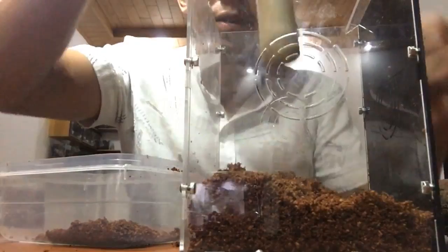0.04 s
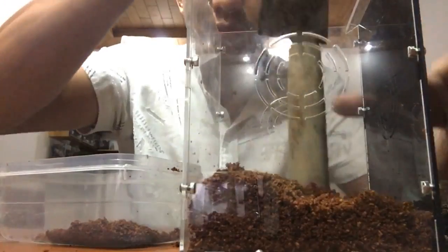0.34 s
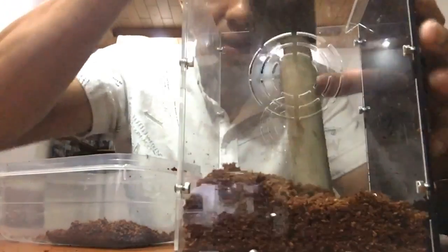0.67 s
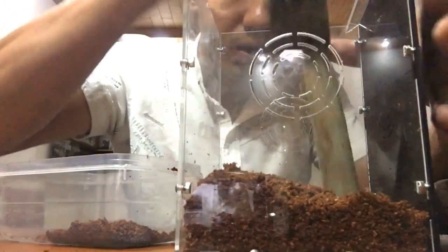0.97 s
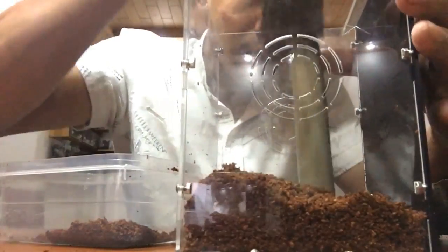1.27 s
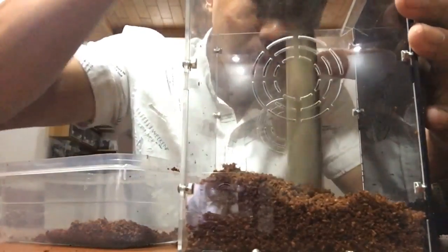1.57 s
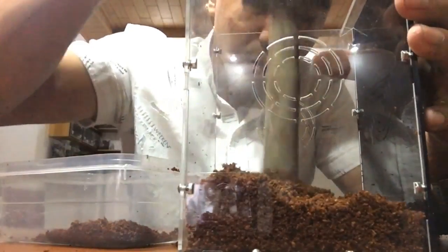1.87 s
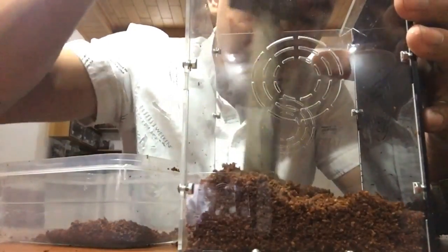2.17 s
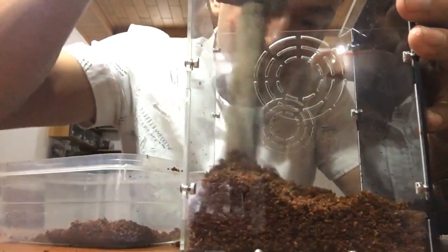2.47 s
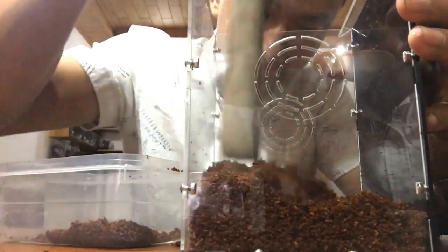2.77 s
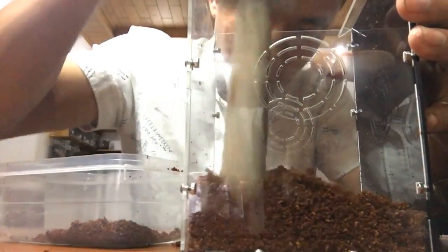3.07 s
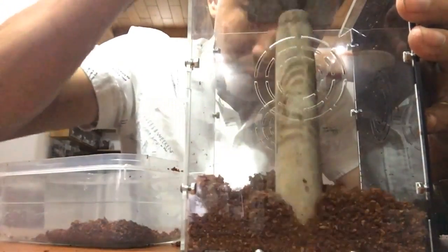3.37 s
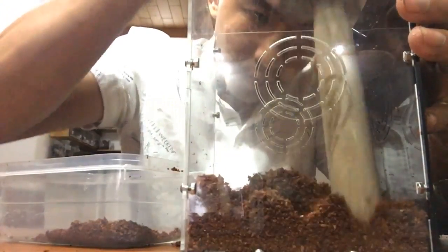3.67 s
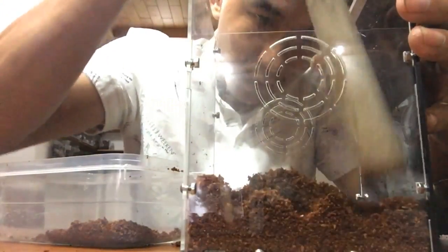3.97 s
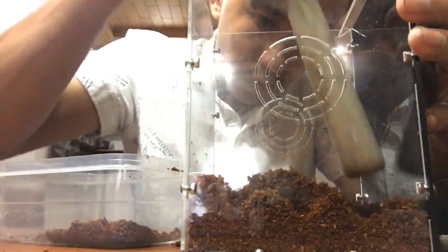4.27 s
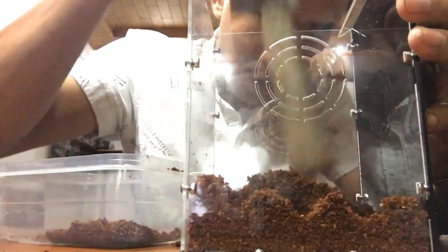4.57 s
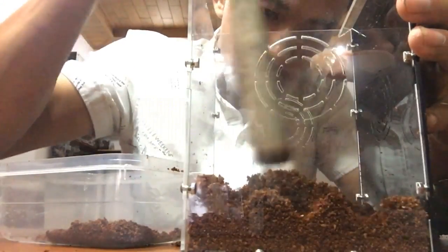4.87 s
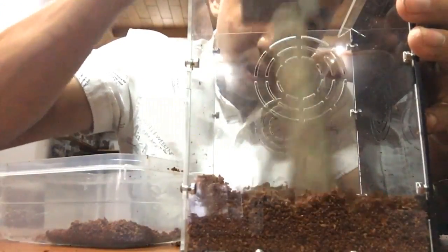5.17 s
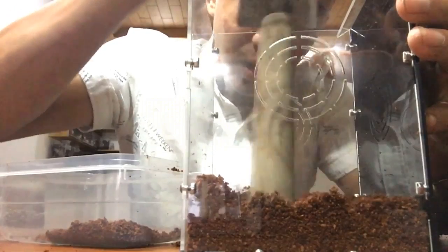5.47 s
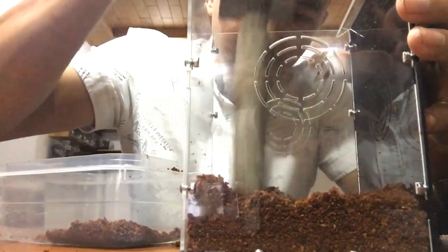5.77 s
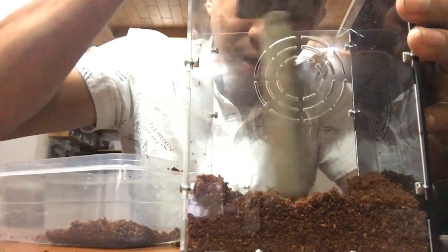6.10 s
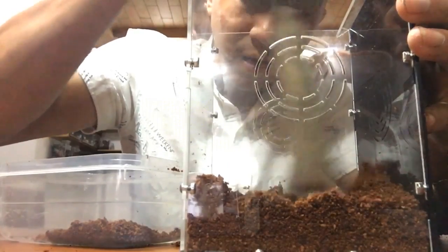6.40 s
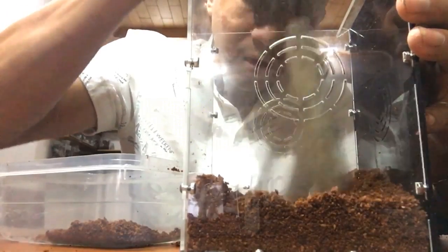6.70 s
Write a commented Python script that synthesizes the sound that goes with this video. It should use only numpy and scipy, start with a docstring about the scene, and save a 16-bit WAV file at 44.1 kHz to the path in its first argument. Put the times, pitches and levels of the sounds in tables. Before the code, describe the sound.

A wooden stick packs loose coconut fibre in a plastic enclosure on a table, heard close in a small room over faint rumble and hiss. It opens with a light rub, a brief faint ring and soft handling bumps. From about 0.8 seconds the stick tamps unevenly, roughly three times a second, each dull thud carrying a slight crunch and a low boom from the table. At about 1.0 and 1.5 seconds it strikes the wall with sharp, briefly ringing clacks. Firmer, evenly spaced thuds follow from 2.4 to 3.2 seconds. At 3.8 seconds a hard knock runs into a gritty scrape lasting a quarter of a second. Another clack comes at 4.2, a deep thump at 4.5 and a last sharp wall strike near 5.1. After that only light taps, rubs and soft bumps remain until about 6.5 seconds.

```python
"""A wooden stick tamps loose coconut coir in a clear plastic enclosure on a table, in a small room.
The coir damps each impact to a dull thud and crunches as it packs; blows that catch a wall excite
bending waves, heard as a click and a clack. Stick-slip friction gives light rubs and one long scrape.
Each push sets the table booming in its low modes, the walls ring briefly, and the room reverberates
over a faint rumble and hiss."""
import sys
import numpy as np
from scipy import signal
from scipy.fft import rfft, irfft
from scipy.io import wavfile

SR = 44100
rng = np.random.default_rng(int(sys.argv[2]) if len(sys.argv) > 2 else 0)


def file_out(sig):
    """Save sig as 16-bit WAV at sys.argv[1]."""
    # one column per channel
    cols = np.atleast_2d(sig).T
    # limit, then scale
    lim = np.clip(cols, -1, 1)
    pcm = np.round(lim * 32767).astype(np.int16)
    wavfile.write(sys.argv[1], SR, pcm)


N = 297234
TIME = np.arange(N) / SR
BLOW_TIME = np.arange(-SR // 100, SR // 6) / SR  # s around an impact
RUB_TIME = np.arange(-SR // 7, SR // 2) / SR  # s around the peak of a rub

# Levels in the tables are relative: the functions apply further gains.
# spectrum of the room's background noise: frequency_hz, level_db
AIR_SPECTRUM = [(15, -57.5), (25, -8), (76, 5), (141, -7.5), (175, -7), (270, -15), (384, -12.5),
                (439, -17.5), (677, -20.5), (1260, -20), (1610, -28.5), (2160, -17), (2480, -29),
                (6210, -35.5), (16000, -51)]
# faint bands of hiss: centre_hz, width_hz, level_db
HISS_BANDS = [(2120, 380, -78), (2950, 500, -84), (6200, 1000, -83)]
# spectrum of snapping fibres: frequency_hz, level_db
CRUNCH_SPECTRUM = [(700, -53), (1800, -4), (2700, 6.5), (3150, -1), (3800, 2), (6000, -6), (8000, -12.5),
                   (10500, -17), (13000, -8.5), (16000, -14)]
# response of the enclosure's body: frequency_hz, level_db
BODY_SPECTRUM = [(60, -14), (150, -20), (215, -6), (290, -13), (400, 5.5), (510, -12.5), (660, 1.5),
                 (850, -4), (1200, -33), (2500, -54.5)]
# response of a wall around its clack pitch: pitch_ratio, level_db
CLACK_SPECTRUM = [(.26, -8.5), (.55, -9.5), (0.751, -3.5), (1., 0.5), (1.35, -9.5), (1.601, -8), (2.1, -22),
                  (3., -41), (7., -55)]
# spectrum of a hard contact: frequency_hz, level_db
CLICK_SPECTRUM = [(700, -31.5), (1800, -10.5), (2700, 3.5), (3150, -1), (3800, -3), (5500, -8.5),
                  (8000, -12), (10500, -17), (13000, -11), (16000, -16)]
# spectrum of the stick being lowered: frequency_hz, level_db
SWISH_SPECTRUM = [(300, 6), (900, 1), (1500, 1), (2600, 6), (4200, -7), (6000, -5), (7800, -10), (9500, -9),
                  (12000, -10), (15000, -18)]
# modes of the whole box, damped by the coir: pitch_hz, level_db, t60_s
BOX_MODES = [(208.7, -1, 0.12), (265, -11, 0.034), (333.8, 5.5, 0.052), (388, -10.5, 0.1),
             (696.4, -8.5, 0.11)]
# modes of the walls: pitch_hz, level_db, t60_s
WALL_MODES = [(232, -10, 0.15), (220, -13, 0.27), (337.9, 5.5, .24), (388, -4.5, 0.21), (414, -5, 0.029),
              (463, -15, 0.38), (611, -6.5, 0.29), (652.6, 6, 0.09), (706.6, -6, 0.18), (851, -7.5, 0.38),
              (1034, -2, 0.092), (1150, 2.5, 0.12), (1300, -18.5, 0.31), (1370, -26, 0.18),
              (1630, -13.5, .15), (1810, 5, .16), (2260, -23.5, .2), (2636, -4.5, 0.14), (2790, 3.5, 0.069),
              (3730, -8, .2), (3520, -4, .18), (3907, 3.5, .22), (4320, -7.5, 0.21), (5026, -11, 0.11),
              (6150, 6, .14)]
# reverberation time of the room: frequency_hz, t60_s
ROOM_DECAY = [(100, 0.9), (300, 0.34), (800, 0.35), (2000, 0.43), (5000, 0.32), (14000, 0.27)]
# narrow resonances of the brief ring at the start: centre_hz, width_hz, level_db
OPENING_RING_BANDS = [(395, 8, -81.5), (755, 99, -54), (1306, 49, -52.5), (1541, 41, -54), (2330, 120, -58),
                      (3460, 47, -62.5)]
# stick or hand rubs on coir and plastic: peak_s, rise_s, fall_s, body_db, wall_db, crunch_db
RUBS = [(0.012, 0.012, 0.033, -40, -41.5, -54), (0.075, 0.041, 0.082, -56, -50, -61.5),
        (0.738, .027, 0.018, -39.5, -44, -59), (2.56, .012, 0.07, -55.5, -55.5, -68.5),
        (2.916, 0.04, .06, -72, -62, -68.5), (3.208, .025, 0.024, -52.5, -49.5, -62.5),
        (3.398, .01, .035, -56.5, -57.5, -75), (3.52, .026, .025, -56.5, -42, -65.5),
        (3.772, .012, 0.034, -35.5, -40, -60.5), (4.1, 0.027, .11, -51, -53.5, -56.5),
        (5.115, 0.038, 0.042, -44.5, -39.5, -54.5), (5.331, .06, 0.23, -62, -61.5, -84),
        (6.072, 0.039, 0.041, -61, -59.5, -84), (6.421, 0.032, 0.055, -65, -66, -77)]
# the side of the stick taps the plastic: start_s, clack_hz, clack_db, click_db
TAPS = [(0.017, 956, -48, -59.5), (0.846, 743, -51.5, -88), (1.039, 1498, -29, -38.5),
        (2.869, 940, -52, -83), (3.297, 1440, -45, -68), (3.597, 613, -45, -80), (3.722, 1147, -46, -65),
        (4.104, 1143, -31, -59.5), (5.287, 1493, -46.5, -74), (5.61, 1120, -53.5, -71),
        (5.664, 1822, -52, -50.5), (6.345, 714, -62.5, -85), (6.512, 1850, -54, -53.5)]
# the steadying hand leans on the enclosure and rocks the table: time_s, level_db
LEANS = [(0.122, -39.5), (0.471, -43.5), (5.928, -51), (6.368, -47), (6.45, -44.5)]
# the stick lands in the coir, then pushes on the table:
# start_s, thud_hz, thud_db, clack_db, click_db, push_delay_s, push_db
TAMPS = [(0.753, 330, -31, -45, -55.5, 0.032, -22.5), (0.872, 388, -43, -47.5, -71, 0.0445, -34),
         (1.071, 490, -31.5, -38.5, -62.5, 0.014, -30), (1.32, 586, -39, -34.5, -55.5, 0.033, -16.5),
         (1.8585, 514.3, -39.5, -33, -62, 0.041, -33), (2.128, 342.6, -38.5, -45.5, -73, 0.05, -27.5),
         (2.393, 421, -22, -33, -59, 0.02, -28.5), (2.679, 494, -22, -31, -56, .03, -29),
         (2.957, 508, -22, -32.5, -59.5, 0.038, -24.5), (3.223, 463, -24, -37.5, -69.5, 0.027, -30),
         (3.471, 601, -43.5, -33, -51.5, 0.042, -29.5), (3.55, 345.7, -33, -43, -55.5, 0.063, -35),
         (3.7361, 446, -43.5, -42, -57, .0335, -19), (3.783, 382.4, -28.5, -39.5, -53.5, 0.0287, -36),
         (3.99, 449, -33, -37, -54, 0.0094, -20), (4.117, 384.3, -33.5, -43, -65, 0.017, -43),
         (4.4693, 443, -27, -40.5, -65, 0.021, -13), (4.7436, 478, -29.5, -41.5, -83, 0.029, -30.5),
         (5.135, 387.3, -28, -32.5, -53.5, 0.02, -21.5)]
# the stick strikes a wall and skids into the coir: start_s, thud_hz, thud_db, clack_hz, clack_db,
# click_db, click_corner_hz, shudder_db, skid_db, push_delay_s, push_db
WALL_HITS = [(1.048, 568, -18.5, 1282, -21, -28.5, 2700, -20, -36.5, .036, -23.5),
             (1.5456, 860, -13.5, 1034, -17.5, -29.5, 2278, -27, -33.5, .082, -19.5),
             (3.832, 620, -16.5, 1042, -31, -45.5, 6100, -48.5, -48.5, 0.071, -31),
             (4.222, 489.4, -34, 1300, -26, -37.5, 3500, -31, -36, 0.035, -16),
             (5.061, 689, -13.5, 1386, -21, -36.5, 7200, -15, -41, .019, -17.5)]
# envelope of the long scrape: time_s, body_db, wall_db, crunch_db
SCRAPE_ENVELOPE = [(3.818, -35, -49.5, -64.5), (3.826, -23, -32.5, -48), (3.834, -18.5, -22.5, -41.5),
                   (3.906, -25, -37.5, -59), (3.924, -21, -26.5, -39), (3.97, -30.5, -21.5, -26),
                   (3.992, -21.5, -30.5, -41.5), (4.016, -45, -42.5, -55), (4.05, -45, -50, -53.5)]


def amp(db):
    """Decibels to amplitude ratio."""
    return 10 ** (np.asarray(db) / 20)


def unit_rms(x):
    """Normalisation to rms 1."""
    return x / np.sqrt(np.mean(x ** 2) + 1e-20)


def read(points, hz):
    """Interpolation on a log-frequency axis."""
    f, value = np.transpose(points)
    return np.interp(np.log(hz + 1), np.log(f + 1), value)


def add(mix, start_s, sound):
    """Superposition of a sound on the mix."""
    at = round(start_s * SR)
    sound = sound[max(-at, 0):]
    part = mix[max(at, 0):][:len(sound)]
    part += sound[:len(part)]


def convolve(x, response):
    """Convolution, cut to the input's length."""
    return signal.oaconvolve(x, response)[:len(x)]


def colour(x, spectrum, size=4096):
    """Minimum-phase filtering by a unit-energy response with the given spectrum."""
    log_gain = np.log(amp(read(spectrum, abs(np.fft.fftfreq(size, 1 / SR)))))
    response = np.fft.ifft(np.exp(np.conj(signal.hilbert(log_gain)))).real[:size // 2]
    return convolve(x, response / np.linalg.norm(response))


def soften(x, corner_hz):
    """A compliant contact loses treble: two one-pole low-passes; rms 1."""
    pole = np.exp(-2 * np.pi * corner_hz / SR)
    for _ in range(2):
        x = unit_rms(signal.lfilter([1], [1, -pole], x))
    return x


def swell(t, rise_s, fall_s):
    """Envelope with exponential flanks and a rounded peak of 1 near t = 0."""
    shape = np.exp(-np.logaddexp(-t / rise_s, t / fall_s))
    return shape / shape.max()


def grains(count, per_s, spread_db):
    """A Poisson train of impulses of uneven size; rms 1."""
    chance, size, sign = rng.random(count), rng.exponential(1, count), rng.choice([-1., 1.], count)
    return unit_rms((chance < per_s / SR) * sign * amp(spread_db * np.minimum(size, 4)))


def ringing(modes, t):
    """Free decay of modes struck together at t = 0; rms 1."""
    partials = (amp(db - 60 * abs(t) / t60) * np.cos(2 * np.pi * hz * t) for hz, db, t60 in modes)
    return unit_rms((t >= 0) * sum(partials))


def noise_bands(bands):
    """White noise shaped by Lorentzian resonance curves."""
    hz, white = np.fft.rfftfreq(N, 1 / SR), rfft(rng.standard_normal(N))
    return sum(amp(db) * unit_rms(irfft(white / (1 + (2 * (hz - centre) / width) ** 2), N))
               for centre, width, db in bands)


def air(rumble_db=-56.5):
    """Stationary background noise: a low rumble and soft hiss."""
    hz, white = np.fft.rfftfreq(N, 1 / SR), rfft(rng.standard_normal(N))
    rumble = unit_rms(irfft(white * amp(read(AIR_SPECTRUM, hz)), N))
    return amp(rumble_db) * rumble + noise_bands(HISS_BANDS)


def opening_ring(time_s=.043):
    """Narrow resonances ring briefly at the start and fade."""
    return noise_bands(OPENING_RING_BANDS) * swell(TIME - time_s, rise_s=.037, fall_s=.056)


def crumbs(per_s=14, level_db=-84, settle_s=.0038):
    """Shot noise: loose bits of coir roll and settle at random, each with a brief crunch."""
    one_roll = swell(TIME[:SR // 20] - .004, .001, settle_s)
    envelope = convolve(abs(grains(N, per_s, spread_db=2)), one_roll)
    return amp(level_db) * unit_rms(colour(envelope * rng.standard_normal(N), CRUNCH_SPECTRUM))


def wall_response(force, pitch_hz):
    """Forced vibration of a wall, strongest near a pitch that depends on the point of contact."""
    return colour(force, np.array(CLACK_SPECTRUM) * [pitch_hz, 1])


def friction(body_gain, wall_gain, crunch_gain, corner_hz):
    """Stick-slip friction: coarse slips shake body and wall; fine ones are snapping fibres."""
    slips = grains(len(body_gain), per_s=4000, spread_db=1)
    snaps = grains(len(body_gain), per_s=6000, spread_db=2.8)
    shake = colour(slips * body_gain, BODY_SPECTRUM) + wall_response(slips * wall_gain, pitch_hz=1150)
    return shake + crunch_gain * soften(colour(snaps, CRUNCH_SPECTRUM), corner_hz)


def stroke(rise_s, fall_s, body_db, wall_db, crunch_db, corner_hz):
    """Brief friction with a Gaussian rise and an exponential fall."""
    shape = np.exp(-np.maximum(-RUB_TIME / rise_s, 0) ** 2 - np.maximum(RUB_TIME / fall_s, 0))
    return friction(amp(body_db) * shape, amp(wall_db) * shape, amp(crunch_db) * shape, corner_hz)


def rubs(gain_db=-1):
    """Light sliding friction of stick or hand between the blows."""
    out = np.zeros(N)
    for peak_s, rise_s, fall_s, *levels_db in RUBS:
        rub = stroke(rise_s, fall_s, *np.add(levels_db, gain_db), corner_hz=2300)
        add(out, peak_s + RUB_TIME[0], rub)
    return out


def burst(lag_s, rise_s, fall_s, strike):
    """Contact force: one impulse of relative size `strike` in a dying flurry of small ones; rms 1."""
    t = BLOW_TIME
    flurry = unit_rms(grains(len(t), per_s=9000, spread_db=3.5) * swell(t - lag_s, rise_s, fall_s))
    impulse = unit_rms(signal.unit_impulse(len(t), np.searchsorted(t, lag_s)))
    return unit_rms(flurry + strike * impulse)


def blow(thud_hz, decay_s, thud_db, clack_hz, clack_db, click_db, corner_hz, shudder_db):
    """Dispersion: bending waves run faster at high pitch, so the click leads, then clack, then thud."""
    t = BLOW_TIME - .004166  # s since the thud's arrival
    thud = unit_rms(swell(t, .00042, decay_s) * -np.cos(2 * np.pi * thud_hz * t))
    onset = 1 - np.exp(-(np.maximum(t, 0) / .003) ** 2)
    flex = unit_rms(ringing(BOX_MODES, t) * onset)
    rattle = unit_rms(colour(burst(.011, .00081, .01, strike=.051), BODY_SPECTRUM))
    shudder = unit_rms(flex + amp(-6) * rattle)
    clack = unit_rms(wall_response(burst(.002, .0019, .0064, strike=.71), clack_hz))
    click = soften(colour(burst(.0014, .0003, .007, strike=.4), CLICK_SPECTRUM), 2 * corner_hz)
    panel_buzz = soften(colour(burst(.005, .0016, .0099, strike=.08), CLICK_SPECTRUM), corner_hz=3500)
    low = amp(thud_db - 1) * thud + amp(shudder_db - .5) * shudder
    high = amp(click_db - 1) * (click + amp(-8) * panel_buzz)
    scale = np.sqrt(.015 / (t[-1] - t[0]))  # refers each rms level to a 15 ms blow
    return scale * (low + amp(clack_db) * clack + high)


def taps():
    """Light impacts excite mostly the wall, with a weaker thud and no push on the table."""
    out = np.zeros(N)
    for start_s, clack_hz, clack_db, click_db in TAPS:
        tap = blow(thud_hz=.53 * clack_hz, decay_s=.0032, thud_db=clack_db - 5, clack_hz=clack_hz,
                   clack_db=clack_db, click_db=click_db, corner_hz=6000, shudder_db=clack_db - 9)
        add(out, start_s + BLOW_TIME[0], tap)
    return out


def wall_ring(drive, ring_db=-13):
    """Resonance: the wall modes ring on after whatever shakes them."""
    ring = convolve(drive, ringing(WALL_MODES, TIME[:SR // 2]))
    return amp(ring_db) * np.std(drive) * unit_rms(ring)


def room(direct, wet_db=-15, gap_s=.0053):
    """Reverberation: sparse reflections, each band decaying at its own rate."""
    count = SR // 2
    reflections = grains(count, per_s=3000, spread_db=.73) * (TIME[:count] > gap_s)
    hz, t, spectra = signal.stft(reflections, SR, nperseg=256)
    decay = amp(-60 * t / read(ROOM_DECAY, hz)[:, None])
    tail = signal.istft(spectra * decay, SR, nperseg=256)[1]
    return amp(wet_db) * convolve(direct, tail / np.linalg.norm(tail))


def table_boom(pitch_hz=73.2, upper_hz=123, upper_db=-19, rise_s=.0038, lead_s=.0088, t60_s=.18):
    """Damped oscillation: each push swings the loaded table in a low mode and a weaker upper one."""
    out, t = np.zeros(N), np.arange(-SR // 12, SR // 2) / SR
    envelope = swell(t + lead_s, rise_s, t60_s / np.log(1000))
    pushes = [(start_s + delay_s, push_db) for start_s, *_, delay_s, push_db in TAMPS + WALL_HITS]
    for time_s, level_db in pushes + LEANS:
        lower = np.cos(2 * np.pi * pitch_hz * t)
        upper = amp(upper_db) * np.cos(2 * np.pi * (upper_hz * t + rng.random()))
        add(out, time_s + t[0], amp(level_db) * envelope * (lower + upper))
    return out


def swish(time_s=.43, level_db=-61):
    """Dense impulses merge into a soft noise as the stick is lowered into the enclosure."""
    noise = colour(grains(N, per_s=6000, spread_db=2.2), SWISH_SPECTRUM)
    return amp(level_db) * swell(TIME - time_s, rise_s=.051, fall_s=.1) * noise


def tamps(firm_db=-25, firm_decay_s=.0014, clack_hz=1094, corner_hz=3500):
    """Inelastic impact: the coir crumbles, stops the tip with a thud, then crunches as it packs."""
    out = np.zeros(N)
    for start_s, thud_hz, thud_db, clack_db, click_db, _, _ in TAMPS:
        force_db = thud_db - firm_db
        decay_s = firm_decay_s * amp(-.23 * force_db)  # firmer tamps stop sooner
        shudder_db = -33 + .42 * force_db  # and shake the box more
        crumble = stroke(.012, .012, clack_db - 16, clack_db - 18, crunch_db=-67, corner_hz=3000)
        pack = stroke(.012, .013, clack_db - 22, clack_db - 12, clack_db - 31, corner_hz=2227)
        impact = blow(thud_hz, decay_s, thud_db, clack_hz, clack_db, click_db, corner_hz, shudder_db)
        add(out, start_s + RUB_TIME[0], crumble)
        add(out, start_s + BLOW_TIME[0], impact)
        add(out, start_s + .026 + RUB_TIME[0], pack)
    return out


def wall_hits(decay_s=.002, hum_db=-27, hum_t60_s=.45):
    """Oblique impact: the stick grazes, strikes and skids; the panel hums on at the thud's pitch."""
    out, t = np.zeros(N), TIME[:SR // 2]
    for (start_s, thud_hz, thud_db, clack_hz, clack_db, click_db, corner_hz,
         shudder_db, skid_db, push_delay_s, _) in WALL_HITS:
        skid_peak_s = .28 * push_delay_s
        graze = stroke(.007, .01, thud_db - 10, clack_db - 18, click_db - 15, corner_hz=2000)
        skid = stroke(skid_peak_s / 2, .32 * push_delay_s, skid_db + 3, skid_db, skid_db - 8,
                      corner_hz=2000)
        impact = blow(thud_hz, decay_s, thud_db, clack_hz, clack_db, click_db, corner_hz, shudder_db)
        hum = amp(clack_db + hum_db - 60 * t / hum_t60_s) * np.sin(2 * np.pi * thud_hz * t)
        add(out, start_s - .004 + RUB_TIME[0], graze)
        add(out, start_s + BLOW_TIME[0], impact)
        add(out, start_s + skid_peak_s + RUB_TIME[0], skid)
        add(out, start_s, hum)
    return out


def scrape(catches_per_s=300, catch_db=2):
    """Sustained friction: the stick drags over grit on the wall, and uneven catches modulate the level."""
    times_s, *levels_db = np.transpose(SCRAPE_ENVELOPE)
    catches = amp(catch_db * np.interp(TIME * catches_per_s, np.arange(N), rng.standard_normal(N)))
    touching = (TIME > times_s[0]) & (TIME < times_s[-1])
    body, wall, crunch = (catches * touching * amp(np.interp(TIME, times_s, db)) for db in levels_db)
    return friction(amp(-5) * body, wall, amp(-.5) * crunch, corner_hz=17000)


def scene():
    """Superposition: contacts ring the walls and the room, over the table's boom and the background."""
    contacts = tamps() + wall_hits() + taps() + rubs() + scrape() + crumbs()
    direct = contacts + wall_ring(contacts) + opening_ring() + swish()
    return (direct + room(direct) + table_boom() + air())[None]


def record(dry, low_cut_hz=36, ceiling=.9, band_limit_hz=15950):
    """Band limiting and saturation: a small microphone sheds deep bass, loud peaks and top treble."""
    thin = signal.sosfiltfilt(signal.butter(2, low_cut_hz, "high", fs=SR, output="sos"), dry)
    rounded = thin / (1 + (thin / ceiling) ** 4) ** (1 / 4)
    low_pass = signal.firwin(511, band_limit_hz, window=("kaiser", 9), fs=SR)
    return signal.oaconvolve(rounded, low_pass[None], "same")


dry = scene()
out = record(dry)
file_out(out)
```